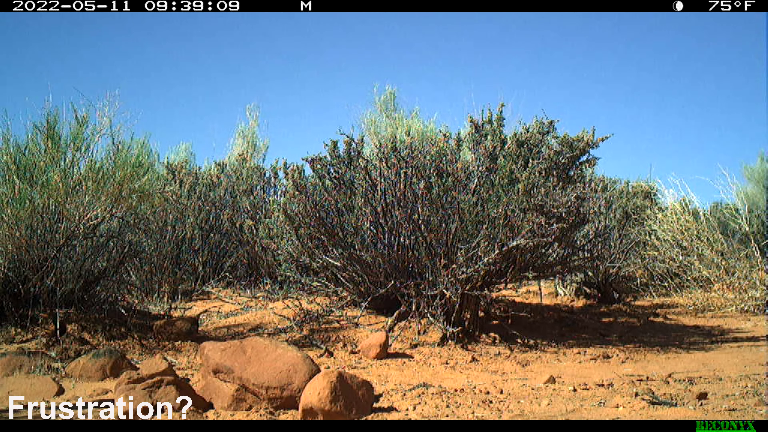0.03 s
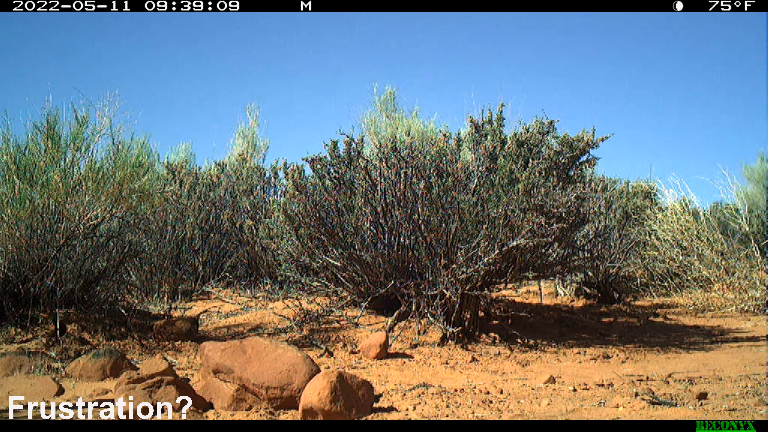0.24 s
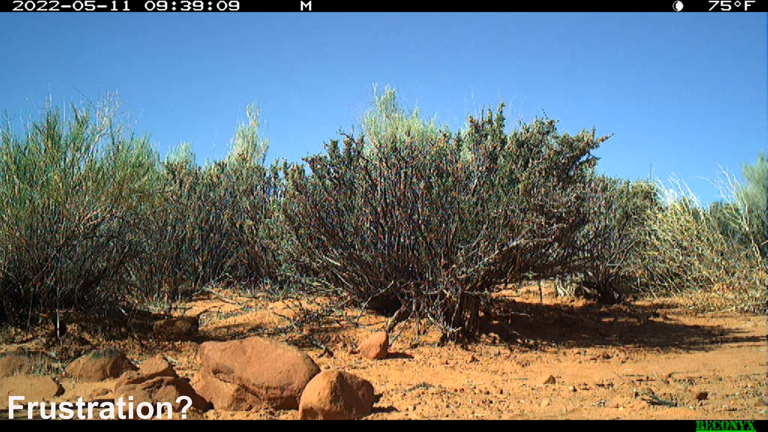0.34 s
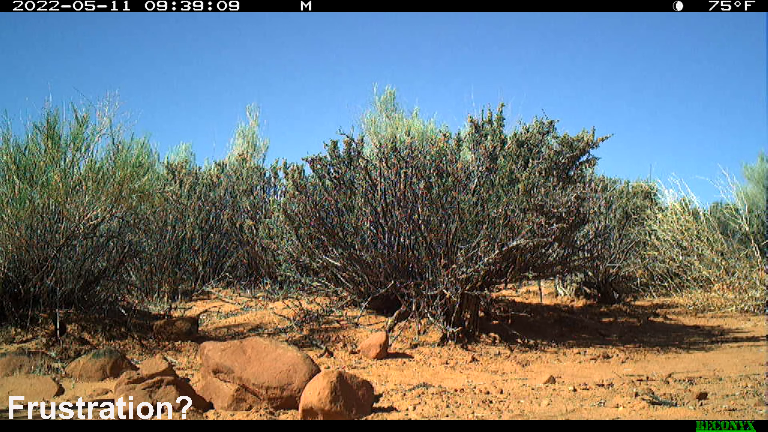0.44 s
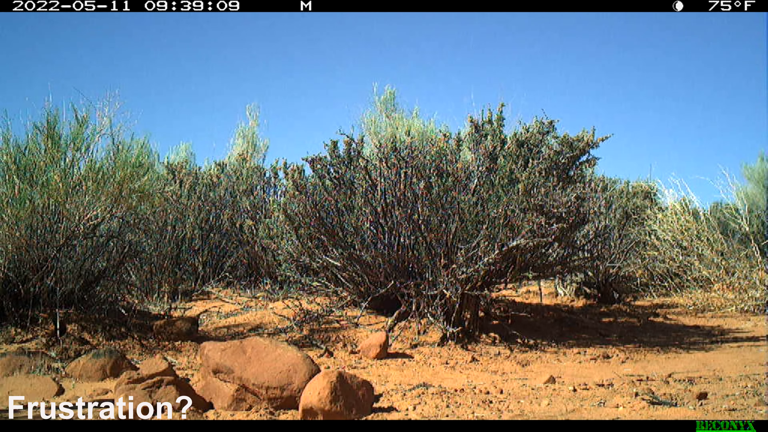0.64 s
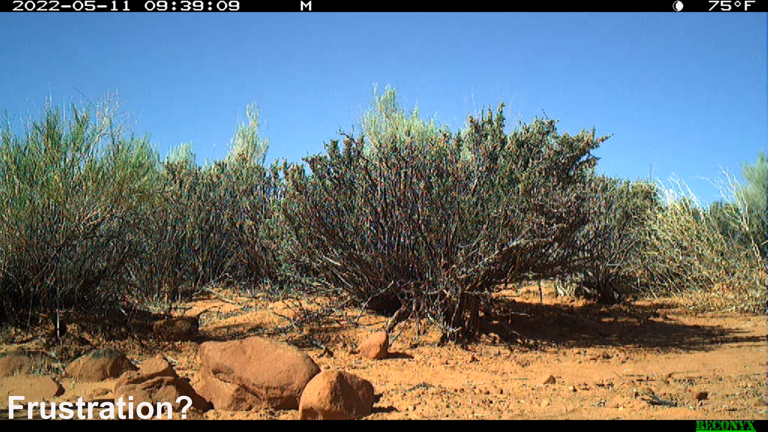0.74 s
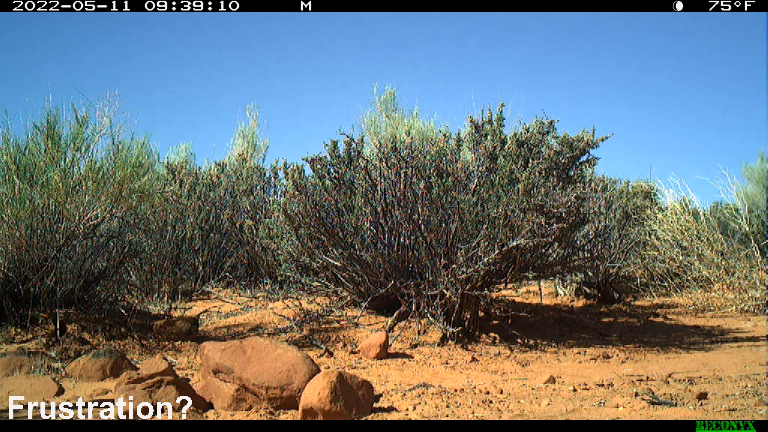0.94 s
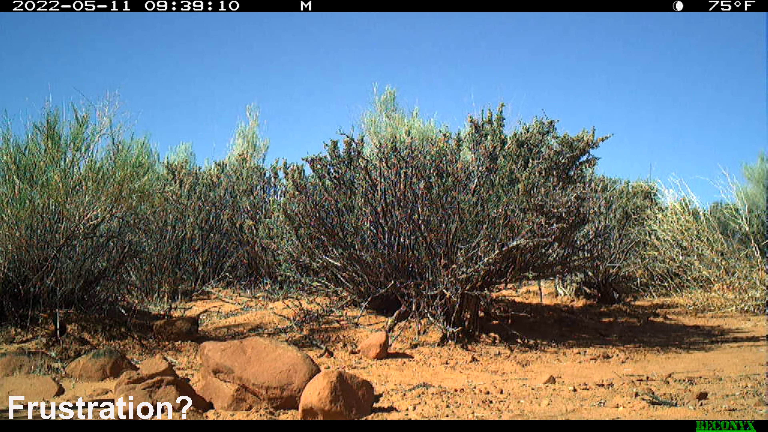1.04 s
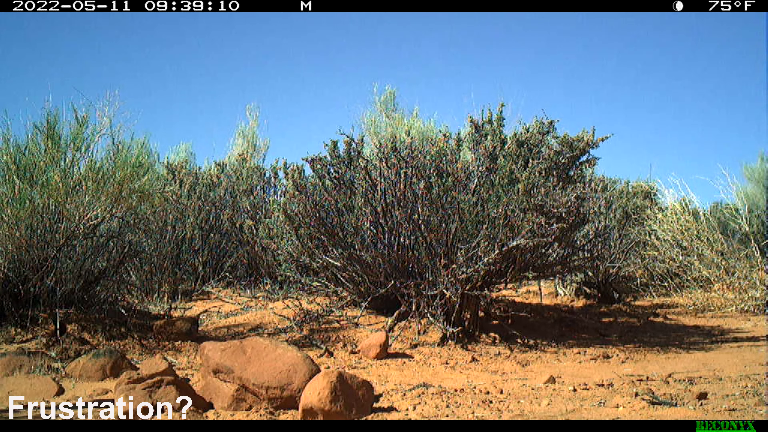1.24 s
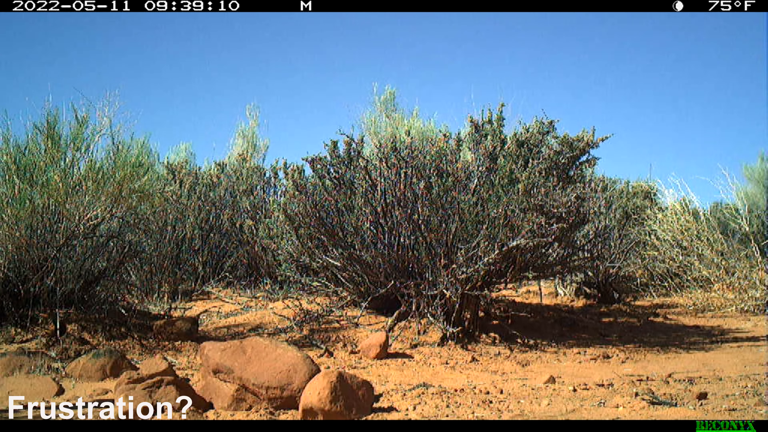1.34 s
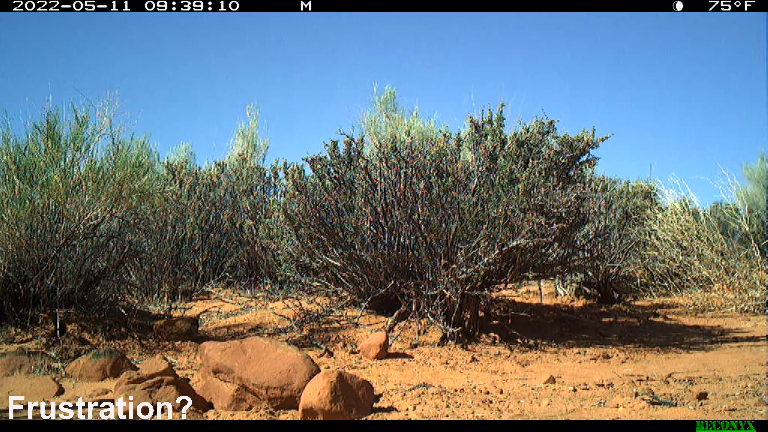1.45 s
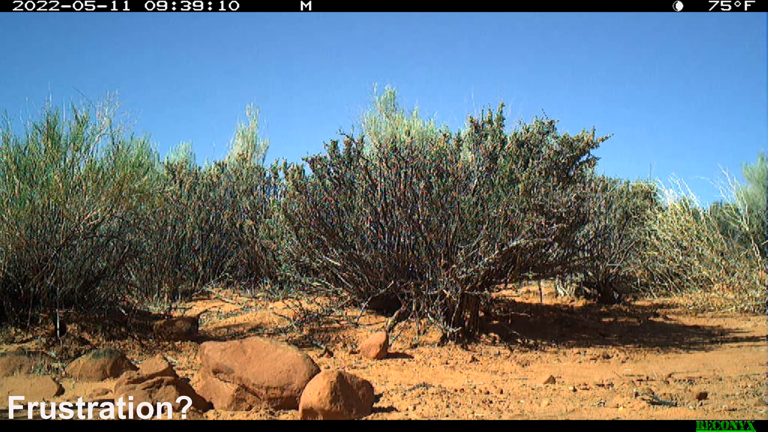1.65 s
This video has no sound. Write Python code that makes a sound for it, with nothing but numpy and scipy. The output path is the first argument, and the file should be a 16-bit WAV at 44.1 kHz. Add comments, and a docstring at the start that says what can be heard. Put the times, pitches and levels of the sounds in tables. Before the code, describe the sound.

A raven caws twice, harsh and rattling, over a faint background hiss.

```python
"""A raven caws twice in still desert scrub, close to a small trail camera. Each caw is a rattle of short bursts
of syrinx pulses ringing the throat, over a rasp of air, ending in a falling croak. Bushes scatter the sound and
a distant rock returns a faint slap. The camera adds rumble, hiss and hum and cuts the treble; the sound is then
turned up and clips on the loudest peaks."""
import sys
import numpy as np
from scipy import signal
from scipy.fft import rfft, irfft
from scipy.io import wavfile

SR = 44100
rng = np.random.default_rng(int(sys.argv[2]) if len(sys.argv) > 2 else 0)


def materialize(psi):
    """Save the field psi as 16-bit PCM at rate SR to the path in sys.argv[1].

    A 1-D psi becomes a single channel; in a 2-D psi each row is a channel.
    """
    bounded = np.clip(np.atleast_2d(psi).T, -1, 1)
    quanta = np.round(bounded * 32767).astype(np.int16)
    wavfile.write(sys.argv[1], SR, quanta)


N = 74970


def amp(db):
    """Decibels to gain."""
    return 10 ** (np.asarray(db) / 20)


def unit_rms(x):
    """Scales to an rms of one."""
    return x / np.sqrt(np.mean(x ** 2) + 1e-20)


def db_at(spectrum, hz):
    """Interpolates a spectrum on a log-frequency axis."""
    knots_hz, db = np.transpose(spectrum)
    return np.interp(np.log(hz + 1), np.log(knots_hz + 1), db)


def add(mix, start_s, sound):
    """Mixes a sound in at start_s."""
    part = mix[round(start_s * SR):][:len(sound)]
    part += sound[:len(part)]


def colour(x, spectrum):
    """Filters by a spectrum in dB."""
    return irfft(rfft(x) * amp(db_at(spectrum, np.fft.rfftfreq(N, 1 / SR))), N)


def noise(spectrum):
    """Steady coloured noise, unit rms."""
    return unit_rms(colour(rng.standard_normal(N), spectrum))


def lowpass(x, hz):
    """Steep FIR low-pass."""
    return signal.oaconvolve(x, signal.firwin(401, hz, window=("kaiser", 9), fs=SR), "same")


# Noise floor spectrum. Each row: frequency in Hz, relative level in dB.
HISS_SPECTRUM = [(20, -4.5), (45, -3), (100, -9.5), (200, -14), (330, -21.5), (430, -20), (520, -23),
                 (650, -23.5), (780, -32.5), (860, -24), (980, -34.5), (1300, -36), (1800, -41.5),
                 (3000, -43), (4300, -44), (4700, -39.5), (5300, -44), (7200, -49.5)]
HISS_DB = -44


def hiss():
    """The camera's steady noise floor: low rumble and hiss."""
    return amp(HISS_DB) * noise(HISS_SPECTRUM)


# Hum tones. Each row: frequency in Hz, rms level in dB.
HUM_TONES = [(79, -49.5), (118, -57), (159, -57.5), (199, -58), (430, -61)]
HUM_WAVER = .3


def hum():
    """The camera's faint hum: low tones wavering in level and phase."""
    t, out = np.arange(N) / SR, np.zeros(N)
    for hz, level_db in HUM_TONES:
        real, imag = signal.resample(rng.standard_normal((2, 12)), N, axis=1)
        waver = 1 + HUM_WAVER * (real + 1j * imag)
        out += amp(level_db) * unit_rms((waver * np.exp(2j * np.pi * hz * t)).real)
    return out


# Throat response to strong pulses. Each row: frequency in Hz, relative gain in dB.
STRONG_THROAT = [(150, -28), (300, -14), (470, -7.5), (700, -19.5), (1030, -2), (1250, -7.5), (1500, -8.5),
                 (1750, -13), (2050, -8.5), (2400, -21), (2700, -7), (2900, 2.5), (3130, 5.5), (3450, -4.5),
                 (3780, 4), (4100, -8.5), (4430, -1), (4620, -9), (5000, 5), (5550, 0), (6150, -12),
                 (7200, -23.5)]
# Duller, broader response to weak pulses. Each row: frequency in Hz, relative gain in dB.
WEAK_THROAT = [(150, -16.5), (380, 2.5), (650, 0.5), (950, 10), (1300, 5.5), (1850, -18), (2400, -10),
               (3000, -1), (4200, -0.5), (5100, -6), (6300, -7), (7200, -29)]
SPREAD_S_PER_HZ = .8e-7  # treble trails bass, rounding each pulse


def throat(formant_scale, softness, size=2048):
    """Ring of the throat after one pulse; softness 0 to 1 blends from strong to weak."""
    signed_hz = np.fft.fftfreq(size, 1 / SR)
    hz = abs(signed_hz) / formant_scale
    gain_db = (1 - softness) * db_at(STRONG_THROAT, hz) + softness * db_at(WEAK_THROAT, hz)
    log_min_phase = np.conj(signal.hilbert(np.log(amp(gain_db))))
    lag_rad = np.pi * SPREAD_S_PER_HZ * signed_hz * abs(signed_hz)
    ring = np.fft.ifft(np.exp(log_min_phase - 1j * lag_rad)).real[:size // 2]
    return ring / np.linalg.norm(ring)


VOICE_DB, SHIMMER_DB, PERIOD_JITTER = 8.5, .73, .012
PUFF_DB, PUFF_DECAY_S = -31.5, .0017
FORMANT_FOLLOW, FORMANT_WANDER = .23, .011
SOFT_BELOW_DB, SOFT_RANGE_DB = -2.5, 12


def syrinx(length_s, pitch_hz, level_db, size=4096):
    """Uneven pulses with puffs of air ring the throat; pitch and level are functions of time."""
    t, out, at_s = np.arange(size) / SR, np.zeros(size), 0
    puff = amp(PUFF_DB) * rng.standard_normal(size)
    median_hz = np.median(RATTLE_BURSTS, axis=0)[3]
    formant_scale = (pitch_hz(length_s / 2) / median_hz) ** FORMANT_FOLLOW
    formant_scale *= 1 + FORMANT_WANDER * rng.standard_normal()
    for jitter, shimmer in rng.standard_normal((24, 2)):
        if at_s >= length_s:
            break
        age_s = t - at_s
        drive = np.sinc(age_s * SR) + puff * (age_s >= 0) * np.exp(-abs(age_s) / PUFF_DECAY_S)
        softness = np.clip((SOFT_BELOW_DB - level_db(at_s)) / SOFT_RANGE_DB, 0, 1)
        gain = amp(VOICE_DB + level_db(at_s) + SHIMMER_DB * shimmer)
        out += gain * signal.fftconvolve(drive, throat(formant_scale, softness))[:size]
        mid_period_s = at_s + .5 / pitch_hz(at_s)
        at_s += (1 + PERIOD_JITTER * jitter) / pitch_hz(mid_period_s)
    return out


# Bursts of both caws. Each row: start in seconds, length in seconds, relative level in dB,
# mid-burst pitch in Hz.
RATTLE_BURSTS = [(.161, 0.0037, -18.5, 452.4), (0.1747, 0.0055, -21, 450), (0.1875, .005, -12, 404.4),
                 (0.2012, 0.0048, -6.5, 450), (0.2176, 0.0063, -0.5, 467), (0.236, 0.0033, 1, 485),
                 (0.2515, 0.01, 0, 504), (0.2692, .009, 0, 530.4), (0.288, .012, 0, 519.7),
                 (0.3057, 0.017, 1, 518.4), (0.329, 0.02, 0, 519.7), (0.3529, 0.02, -0.5, 512),
                 (0.376, 0.019, 1, 502.8), (.399, .021, 1, 489), (0.425, .015, 1.5, 462.4),
                 (0.4415, .022, -0.5, 447), (1.2172, .001, -6.5, 422), (1.235, .004, -13.5, 432),
                 (1.2518, .002, -12, 432), (1.2645, 0.0079, -1, 458), (1.2825, 0.0064, -0.5, 469),
                 (1.3017, 0.009, 0, 466.3), (1.3207, 0.011, 0.5, 472), (1.3402, 0.015, 0.5, 492),
                 (1.3617, 0.02, -0.5, 487.4), (1.3852, .019, 0.5, 496), (1.4085, .019, 0, 498),
                 (1.4328, 0.019, 0.5, 491.6), (1.4607, 0.017, 0, 473.3), (1.4834, 0.02, -0.5, 465.6),
                 (1.5146, 0.018, -1.5, 441.3)]
GLIDE_PER_S = 4.82
ONSET_DB, SETTLE_S, CHOKE_DB, CHOKE_POWER = -2, .0015, -8, 6.3


def rattle():
    """Short bursts of syrinx pulses; each builds up, climbs in pitch and chokes off."""
    out = np.zeros(N)
    for start_s, length_s, burst_db, mid_hz in RATTLE_BURSTS:
        def pitch_hz(t):
            return mid_hz * (1 + GLIDE_PER_S * (t - length_s / 2))

        def level_db(t):
            return burst_db + ONSET_DB * np.exp(-t / SETTLE_S) + CHOKE_DB * (t / length_s) ** CHOKE_POWER

        add(out, start_s, syrinx(length_s, pitch_hz, level_db))
    return out


# Breath spectrum. Each row: frequency in Hz, relative level in dB.
RASP_SPECTRUM = [(150, -28), (450, -1), (680, -9.5), (950, 3.5), (1350, -1), (1850, -11), (2400, -10.5),
                 (3000, -2), (3800, -2), (4300, -3.5), (5100, 2), (6300, -10), (7200, -23.5)]
# One breath per caw. Each row: start, full, release and end times in seconds, held level in dB.
RASP_SWELLS = [(0.167, .215, 0.447, .5, -23.5), (1.208, 1.275, 1.515, 1.552, -24.5)]
RASP_EDGE_DB = -21


def rasp():
    """Air through the throat swells, holds and fades under each caw."""
    t, air, out = np.arange(N) / SR, noise(RASP_SPECTRUM), np.zeros(N)
    for start_s, full_s, release_s, end_s, level_db in RASP_SWELLS:
        swell_db = np.interp(t, [start_s, full_s, release_s, end_s], [RASP_EDGE_DB, 0, 0, RASP_EDGE_DB])
        out += air * amp(level_db + swell_db) * (t > start_s) * (t < end_s)
    return out


def scatter(x, delay_s, t60_s):
    """Many small reflections that start after a delay and die away."""
    t = np.arange(SR // 2) / SR
    tail = rng.standard_normal(len(t)) * (t > delay_s) * np.exp(-np.log(1000) * t / t60_s)
    return signal.fftconvolve(x, tail / np.linalg.norm(tail))[:N]


# Colour of the rock reflection. Each row: frequency in Hz, relative gain in dB.
ECHO_SPECTRUM = [(300, -3.5), (800, -4.5), (1200, 7), (1700, -5), (3000, -20.5), (4100, -12), (4750, -1.5),
                 (5500, -15.5), (7200, -14)]
ECHO_DB = -32.5


def rock_echo(x):
    """A faint slap from a distant rock."""
    return amp(ECHO_DB) * colour(scatter(x, delay_s=.065, t60_s=.08), ECHO_SPECTRUM)


# One croak per caw. Each row: start in seconds, length in seconds, relative level in dB,
# start pitch in Hz, end pitch in Hz, fade in dB.
CLOSING_CROAKS = [(.469, 0.041, 0.5, 416.3, 308, -31), (1.537, 0.016, -4.5, 373, 283, -34)]
SAG_POWER, FADE_POWER = 2.6, 1.8


def croaks():
    """Each caw ends as the pulses hold briefly, then slow down and die away."""
    out = np.zeros(N)
    for start_s, length_s, croak_db, start_hz, end_hz, fade_db in CLOSING_CROAKS:
        def pitch_hz(t):
            return start_hz + (end_hz - start_hz) * (t / length_s) ** SAG_POWER

        def level_db(t):
            return croak_db + fade_db * (t / length_s) ** FADE_POWER

        add(out, start_s, syrinx(length_s, pitch_hz, level_db))
    return out


NEAR_SCRUB_DB, FAR_SCRUB_DB = -18, -46.5


def scene():
    """The raven and its reflections from scrub and a rock, over hiss and hum; mono."""
    raven = rasp() + rattle() + croaks()
    near = amp(NEAR_SCRUB_DB) * scatter(raven, delay_s=.0051, t60_s=.045)
    far = amp(FAR_SCRUB_DB) * scatter(raven, delay_s=.045, t60_s=.35)
    return (raven + near + far + rock_echo(raven) + hiss() + hum())[None]


MIC_CUTOFF_HZ, OUTPUT_CUTOFF_HZ = 7400, 16000
CEILING, KNEE_POWER = .74, 12.0


def record(dry):
    """The camera cuts the treble; the sound is then turned up, clipped on peaks and low-passed."""
    mic = lowpass(dry[0], MIC_CUTOFF_HZ)
    clipped = mic / (.5 + abs(mic / CEILING) ** KNEE_POWER) ** (1 / KNEE_POWER)
    return lowpass(clipped, OUTPUT_CUTOFF_HZ)[None]


dry = scene()
out = record(dry)
materialize(out)
```